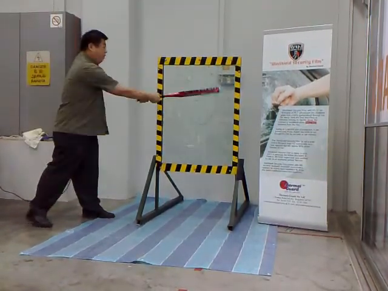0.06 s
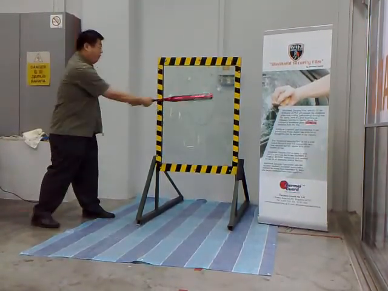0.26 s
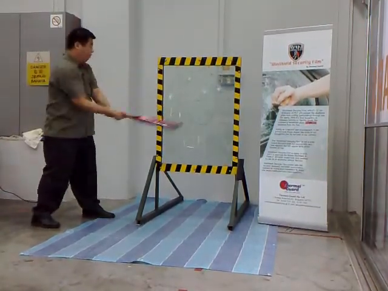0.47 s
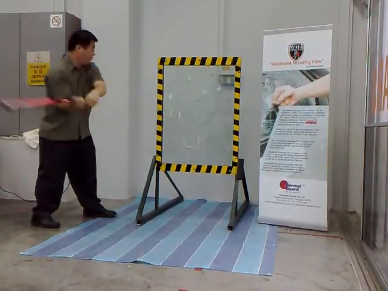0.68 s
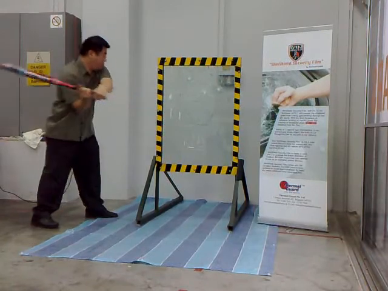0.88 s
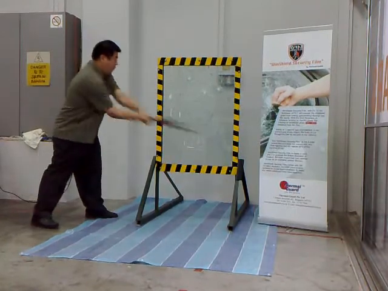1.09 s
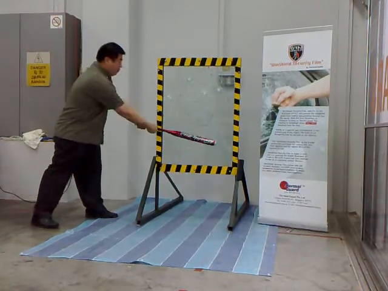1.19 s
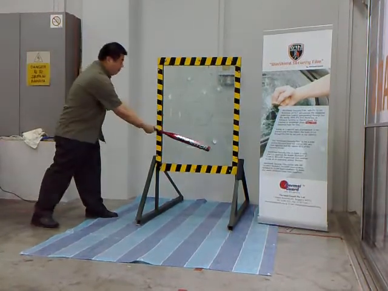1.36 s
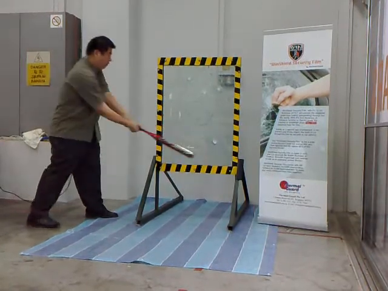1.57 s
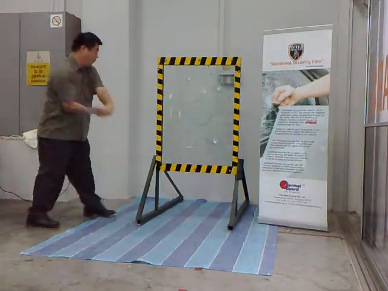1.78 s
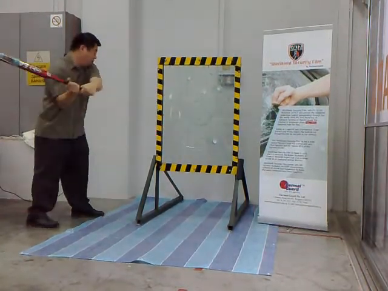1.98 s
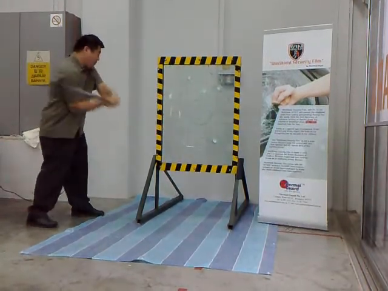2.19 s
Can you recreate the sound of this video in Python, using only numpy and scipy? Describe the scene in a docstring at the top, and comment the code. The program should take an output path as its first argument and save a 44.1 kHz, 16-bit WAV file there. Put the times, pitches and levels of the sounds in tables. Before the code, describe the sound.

A metal bat strikes a glass panel twice, with sharp cracks echoing through a large workshop.

```python
"""Bat on laminated glass.

A hollow metal bat strikes a glass panel in a large hard-walled workshop. Each blow is a crack from
the glass, the ring of bat and steel frame and a shudder of the stand, with a long echoing tail.
An earlier blow is still dying away over faint ventilation. The small microphone overloads."""
import sys
import numpy as np
from scipy import signal
from scipy.fft import rfft, irfft
from scipy.io import wavfile

SR = 44100
rng = np.random.default_rng(int(sys.argv[2]) if len(sys.argv) > 2 else 0)


def wav_out(sig):
    """Save sig, one row per channel (or a flat mono array), as 16-bit PCM at SR to the path in sys.argv[1]."""
    wavfile.write(sys.argv[1], SR, np.round(np.clip(np.atleast_2d(sig).T, -1, 1) * 32767).astype(np.int16))


N = 99225

# Blows: start_s, strike_db, shudder_db, shudder_s, mic_swing_db, snap_db, clang_db,
# boom_db, low_mid_db, treble_db, bat_db, frame_db
BLOWS = [(-.95, 5, -30, .05, -30, 0, 0, -15, -1.5, 0, -14.5, -28),
         (.2425, 1, -2, .082, -4.5, -3, -3, -12.5, -2.5, 2, -14.5, -15.5),
         (1.442, 2, -9.5, 0.011, -25, -3, -20.5, -5, -10, 7.5, -18, -25.5)]
# Glass crack spectrum: freq_hz, level_db
CRACK_SPECTRUM = [(30, -51), (90, -2.5), (230, -8.5), (800, -16.5), (1400, -10.5), (2000, -13.5),
                  (2350, -15), (2650, -23.5), (3050, -21.5), (3600, -26), (4150, -16), (4800, -29),
                  (5900, -22.5), (6350, -32), (8300, -29.5), (11000, -38), (15000, -51)]
# Contact snap spectrum: freq_hz, level_db
SNAP_SPECTRUM = [(300, -35.5), (2000, -11.5), (4200, 12.5), (6500, -5.5), (9000, 0.5), (14000, -20)]
# Contact clang spectrum: freq_hz, level_db
CLANG_SPECTRUM = [(200, -31), (800, -16), (1500, -3.5), (2100, 0), (2500, -12.5), (3000, -14), (6000, -38),
                  (12000, -47)]
# Bat modes: pitch_hz, level_db, t60_s
BAT_MODES = [(1411, -2, .1), (2046, -17, .2), (2199, 0, .25), (3004, -24, .2), (4090, -16, .08),
             (4330, -20, .08), (5270, -22, .25), (5590, -14, .08), (5986, -11, .08)]
# Stand rumble spectrum: freq_hz, level_db
SHUDDER_SPECTRUM = [(25, 2.5), (100, -9), (450, -4), (1200, -10.5), (2000, -15.5), (4000, -66)]
# Workshop decay: freq_hz, t60_s
HALL_DECAY = [(60, 1.76), (160, 1.67), (420, 2.255), (1100, 2.44), (2200, 2.47), (4000, 1.9), (6000, 1.35),
              (8000, 1.04), (12000, 0.77), (16000, 0.94)]
# Ventilation spectrum: freq_hz, level_db
VENT_SPECTRUM = [(25, -0.5), (60, 1.5), (200, -8), (600, -11.5), (2000, -20), (6000, -49.5), (16000, -64)]


def strike(snap_db, clang_db, boom_db, low_mid_db, treble_db, bat_db, frame_db, rise_s=0.004):
    """One blow excites glass, bat and frame; fades out over its last second."""
    t = np.arange(3 * SR) / SR
    sound = glass_crack(t, boom_db, low_mid_db, treble_db) + contact(t, snap_db, clang_db)
    sound += bat_ring(t, bat_db) + frame_ring(t, frame_db)
    return sound * np.minimum(t / rise_s, 1) * np.minimum(3 - t, 1)


def glass_crack(t, boom_db, low_mid_db, treble_db, boom_hz=370, low_mid_hz=756, treble_hz=2800):
    """The crack fills the hall: its echoes, coloured by the glass."""
    hz = np.fft.rfftfreq(len(t), 1 / SR) + 1
    level_db = 45 + lookup(CRACK_SPECTRUM, hz)
    level_db += boom_db / (1 + (hz / boom_hz) ** 4)
    level_db += low_mid_db * np.exp(-np.log2(hz / low_mid_hz) ** 2)
    level_db += treble_db / (1 + (treble_hz / hz) ** 4)
    return irfft(rfft(hall()[:len(t)]) * gain(level_db), len(t))


def contact(t, snap_db, clang_db, snap_s=0.0043, clang_t60_s=0.18):
    """Bat meets glass: a bright snap and a short noisy clang."""
    snap = noise(len(t), SNAP_SPECTRUM) * gain(snap_db) * np.exp(-(t / snap_s) ** 4)
    clang = noise(len(t), CLANG_SPECTRUM) * gain(clang_db - 60 * t / clang_t60_s)
    return snap + clang


def bat_ring(t, level_db, echo_db=9.5):
    """Damped modes of the hollow bat, plus their echo."""
    ring = sum(gain(db - 60 * t / t60_s) * np.sin(2 * np.pi * hz * t) for hz, db, t60_s in BAT_MODES)
    echo = gain(echo_db) * signal.fftconvolve(ring, hall())[:len(t)]
    return gain(level_db) * (ring + echo)


def frame_ring(t, level_db, pitch_hz=1852, t60_s=2.4, rise_s=0.05):
    """One steel frame mode builds up and rings on."""
    envelope = gain(level_db - 60 * t / t60_s) * (1 - np.exp(-t / rise_s))
    return envelope * np.sin(2 * np.pi * pitch_hz * t)


def stand_shudder(level_db, length_s, stop_s=0.0031):
    """A low rumble swells and stops short."""
    t = np.arange(SR) / SR
    envelope = (t / length_s) ** 0.97 * np.clip((length_s - t) / stop_s, 0, 1)
    return gain(level_db) * noise(SR, SHUDDER_SPECTRUM) * envelope


def mic_swing(level_db, delay_s, peak_s=0.011):
    """The overloaded microphone recovers with one slow swing."""
    after = np.maximum(np.arange(SR) / SR - delay_s, 0) / peak_s
    return gain(level_db) * after * np.exp(-after ** 2 / 2)


def hall(delay_s=0.001, build_s=0.0037):
    """Wall reflections: sparse taps of random sign, each band dying at its own rate."""
    taps = np.zeros(3 * SR)
    slots = np.arange(0, 3 * SR - 10, 10)
    taps[slots + rng.integers(0, 10, len(slots))] = rng.choice([-1., 1.], len(slots))
    hz, t, bands = signal.stft(taps, SR, nperseg=512)
    decay_db = -60 * (t / lookup(HALL_DECAY, hz)[:, None]) ** 1.08
    tail = signal.istft(bands * gain(decay_db), SR, nperseg=512)[1]
    tail *= np.clip((np.arange(len(tail)) / SR - delay_s) / build_s, 0, 1)
    return tail / np.linalg.norm(tail)


def ventilation(level_db=-49):
    """Steady low rush of air."""
    return gain(level_db) * noise(N, VENT_SPECTRUM)


def noise(size, spectrum):
    """Shaped noise, rms 1."""
    hz = np.fft.rfftfreq(size, 1 / SR)
    shaped = irfft(rfft(rng.standard_normal(size)) * gain(lookup(spectrum, hz)), size)
    return shaped / np.sqrt(np.mean(shaped ** 2) + 1e-20)


def lookup(table, hz):
    """Interpolate over log frequency."""
    freq_hz, value = np.transpose(table)
    return np.interp(np.log(hz + 1), np.log(freq_hz + 1), value)


def gain(db):
    """dB to amplitude."""
    return 10 ** (np.asarray(db) / 20)


def scene():
    """Echoing blows over ventilation, mono."""
    lead = SR  # room for the blow before time zero
    mix = np.zeros(lead + N + 3 * SR)
    for start_s, strike_db, shudder_db, shudder_s, mic_swing_db, *colour_db in BLOWS:
        at = lead + round(start_s * SR)
        mix[at:at + 3 * SR] += gain(strike_db) * strike(*colour_db)
        mix[at:at + SR] += stand_shudder(shudder_db, shudder_s) + mic_swing(mic_swing_db, shudder_s)
    return (mix[lead:lead + N] + ventilation())[None]


def record(dry):
    """Overloaded microphone: coupling high-pass, lagging gain control, soft clip, band limit."""
    coupling_hz, drive_db, edge_hz = 4.9, 2, 16200
    threshold_db, slope, follow_s = -19, 0.17, 0.013
    ceiling, hardness = 0.72, 5.8
    driven = signal.lfilter(*signal.butter(1, coupling_hz, "high", fs=SR), dry) * gain(drive_db)
    pole = np.exp(-1 / (follow_s * SR))
    power_db = 10 * np.log10(signal.lfilter([1 - pole], [1, -pole], driven ** 2) + 1e-12)
    held = driven / gain(slope * np.maximum(power_db - threshold_db, 0))
    clipped = held / (1 + np.abs(held / ceiling) ** hardness) ** (1 / hardness)
    lowpass = signal.firwin(511, edge_hz, window=("kaiser", 9), fs=SR)
    return signal.oaconvolve(clipped, lowpass[None], "same")


dry = scene()
out = record(dry)
wav_out(out)
```